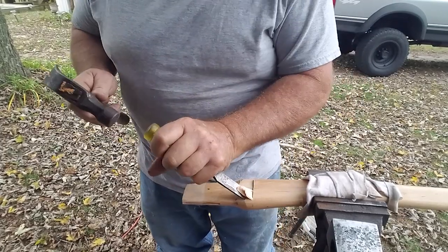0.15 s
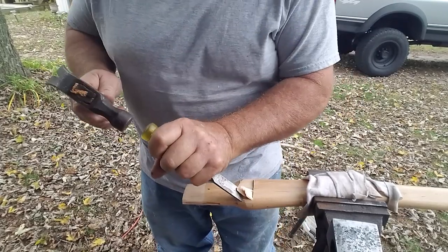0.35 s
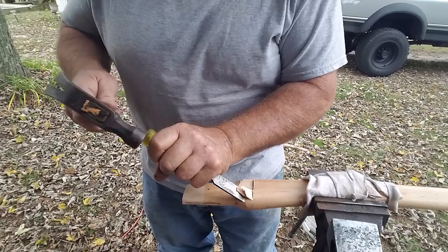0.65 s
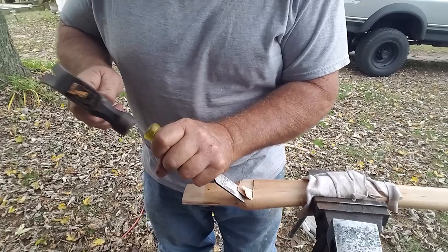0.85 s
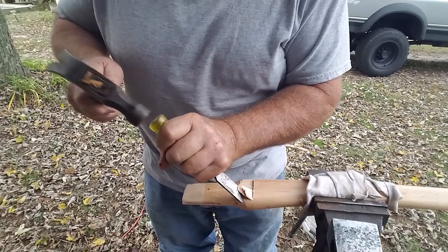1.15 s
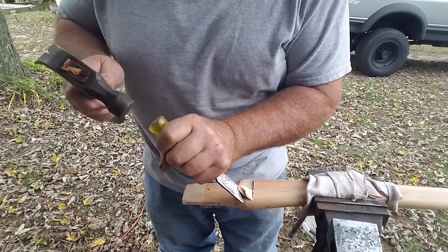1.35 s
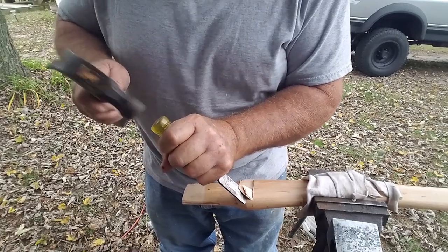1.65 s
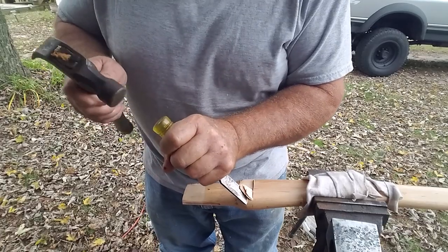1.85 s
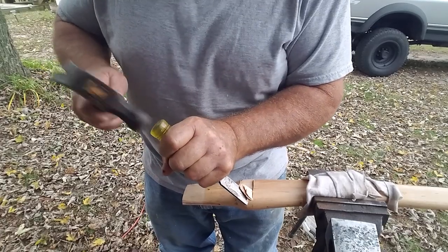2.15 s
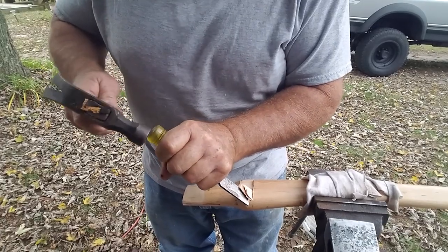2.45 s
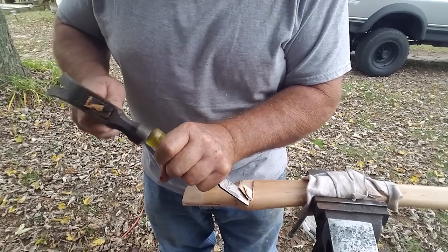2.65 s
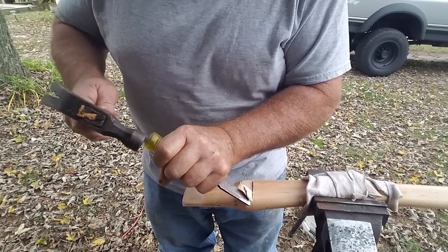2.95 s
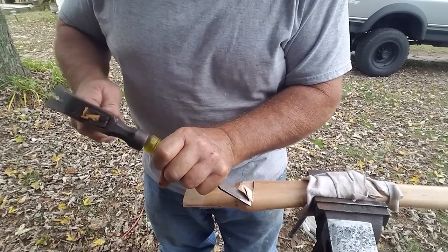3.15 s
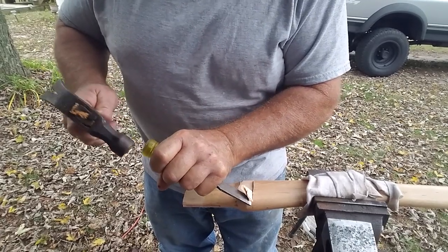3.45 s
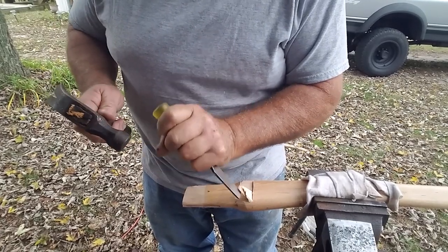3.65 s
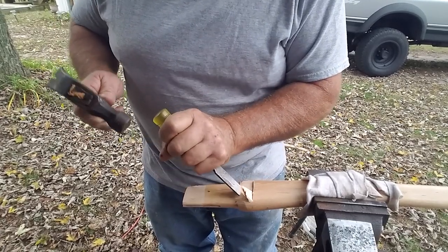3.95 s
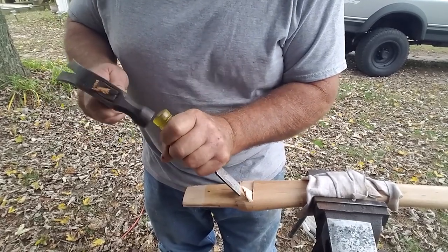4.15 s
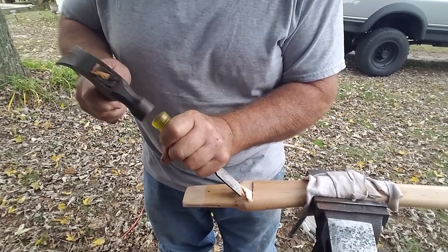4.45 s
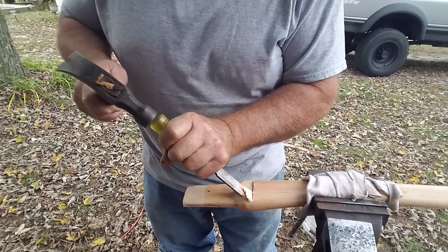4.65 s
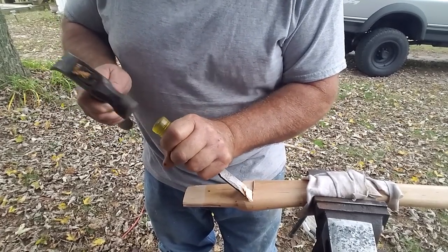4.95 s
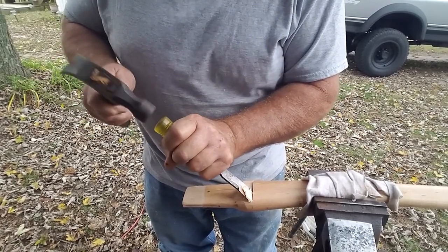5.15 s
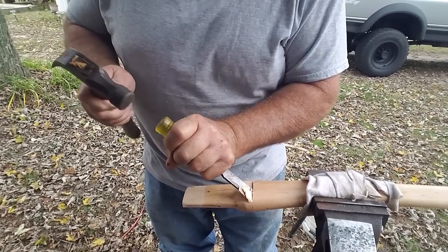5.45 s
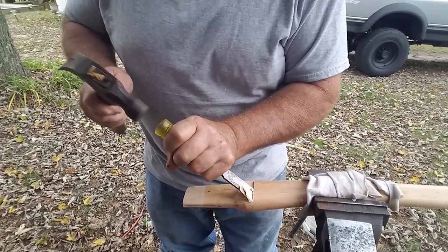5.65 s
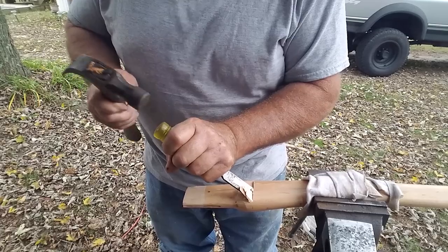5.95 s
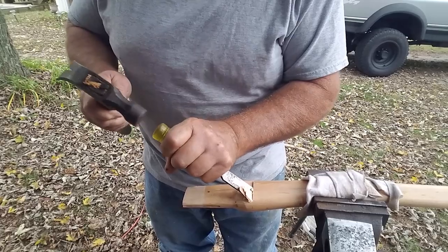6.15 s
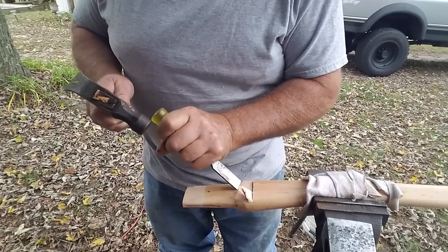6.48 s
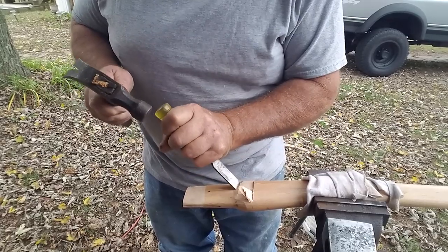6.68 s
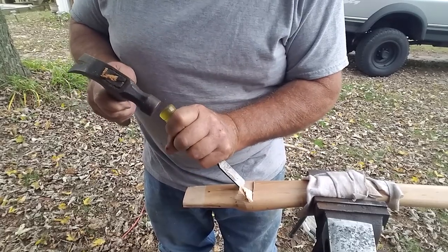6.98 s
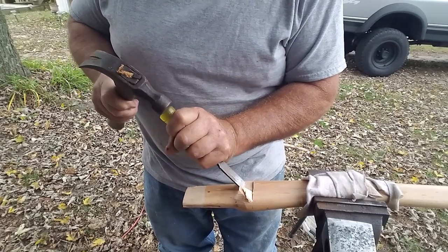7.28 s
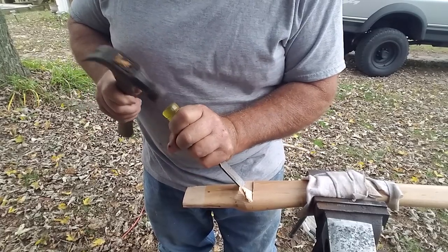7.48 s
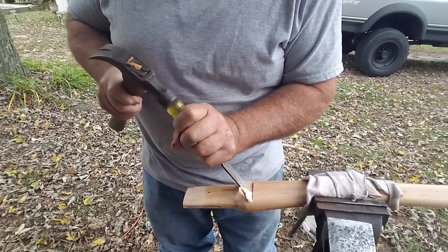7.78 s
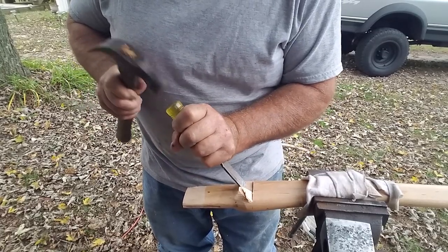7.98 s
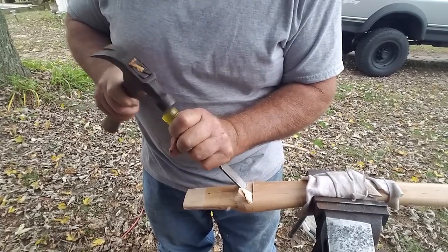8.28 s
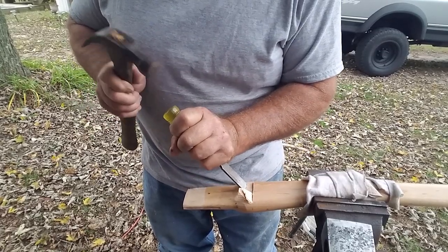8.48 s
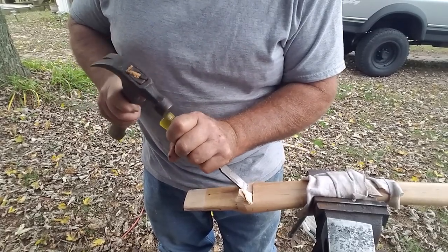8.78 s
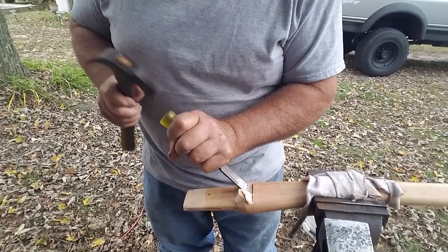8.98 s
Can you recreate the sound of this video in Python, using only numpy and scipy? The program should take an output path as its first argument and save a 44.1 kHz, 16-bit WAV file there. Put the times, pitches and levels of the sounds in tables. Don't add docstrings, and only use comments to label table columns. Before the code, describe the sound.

A steel hammer taps then drives a chisel into wood in a loose clanking vise, about four blows a second, with crickets chirping outdoors.

```python
import sys
import numpy as np
from scipy import signal
from scipy.fft import rfft, irfft, next_fast_len
from scipy.io import wavfile
from scipy.ndimage import uniform_filter1d, map_coordinates

SR = 44100
rng = np.random.default_rng(int(sys.argv[2]) if len(sys.argv) > 2 else 0)


def how_loud(loudness_db):
    steps = np.asarray(loudness_db, float) / 20
    return 10 ** steps


def pcm_store(signal):
    levels = np.round(np.clip(np.atleast_2d(signal), -1, 1) * 32767)
    wavfile.write(sys.argv[1], SR, levels.astype(np.int16).T)


N = 402191


def along(points, hz):
    f, v = np.transpose(points)
    return np.interp(np.log(hz + 1), np.log(f + 1), v)


def at(s, points):
    return np.interp(s, *np.transpose(points))


def nearest(s, rows):
    return min(rows, key=lambda row: abs(row[0] - s))[1:]


def unit(x):
    return x / np.sqrt(np.mean(x ** 2) + 1e-20)


def wobble(rate_hz):
    knots = rng.standard_normal(int(N * rate_hz / SR) + 4)
    return map_coordinates(knots, [np.arange(N) * rate_hz / SR])


def sine(hz, t):
    return np.sin(2 * np.pi * hz * t)


def glide(hz):
    return np.sin(2 * np.pi * np.cumsum(hz) / SR)


def filtered(x, response):
    n = x.shape[-1]
    m = next_fast_len(n + 4096)
    return irfft(rfft(x, m) * response(np.fft.rfftfreq(m, 1 / SR)), m)[..., :n]


def add(track, s, sound):
    part = track[..., round(s * SR):][..., :sound.shape[-1]]
    part += sound[..., :part.shape[-1]]


def noise(size, spectrum, alike):
    def mid_side(hz):
        turn = np.arccos(np.clip(along(alike, hz), -1, 1)) / 2
        return how_loud(along(spectrum, hz)) * [np.cos(turn), np.sin(turn)]

    mid, side = filtered(rng.standard_normal((2, size)), mid_side)
    return unit(np.array([mid + side, mid - side]))


# t/s, rumble/dB, drone/dB, hiss/dB
YARD = [(0.0, -67, -55.5, -71), (1.399, -62, -55.5, -70), (2.439, -50.5, -53.5, -72.5),
        (4.001, -52, -53.5, -70), (6.069, -56, -56.5, -73.5), (6.9, -51.5, -52.5, -70),
        (7.6, -55, -52.5, -69), (9.12, -51.5, -55.5, -77)]
# f/Hz, density/dB
RUMBLE = [(20,-18),(40,-1),(70,2.5),(110,-3.5),(160,0),(300,-46.5)]
DRONE = [(71, -46), (120, -23.5), (236, -8), (393, -9.5), (421, -21.5), (459, -1.5), (499, -11.5),
         (866, -14), (1250, -21.5), (1750, -20.5), (2100, -22.5), (3500, -29), (4550, -55.5), (7700, -120)]
HISS = [(1500, -12), (2700, -2), (3130, -12), (3920, -3.5), (4010, -5), (4420, -6), (4820, -13),
        (5710, -6.5), (6080, -5), (6650, -21), (7620, -11.5), (8800, -22), (15200, -13.5), (16000, -16),
        (17000, -44.5)]
# f/Hz, left-right likeness; f/Hz, left-right level/dB
FAR = [(60, 0.88), (180, 0.99), (550, 0.54), (1650, -0.34), (4970, -0.17), (15000, -0.22)]
FAR_LEAN = [(60, -1), (180, 4.5), (550, 2.5), (1650, 2), (4970, -0.5), (15000, -5)]


def yard():
    s, *levels = np.transpose(YARD)
    rumble_db, drone_db, hiss_db = [np.interp(np.arange(N) / SR, s, db) for db in levels]
    rumble = how_loud(rumble_db - 2.6 + 2.6 * wobble(12.0)) * noise(N, RUMBLE, FAR)
    drone = how_loud(drone_db - 3.0 + 0.96 * wobble(8.9)) * noise(N, DRONE, FAR)
    hiss = how_loud(hiss_db + 5.0 + 0.7 * wobble(16)) * noise(N, HISS, FAR)
    lean = lambda hz: (hz < 15900) * how_loud(along(FAR_LEAN, hz) * np.array([[.5], [-.5]]))
    return filtered(rumble + drone + hiss, lean)


# t/s, f/Hz, level/dB
WHINE = [(5.9,1500,-85),(6.2,1550,-71),(6.6,1640,-68),(6.9,1680,-68),(7.1,1620,-65),(7.47,1645,-64),(7.7,1640,-62),(7.9,1620,-66),(8.17,1590,-66),(8.3,1600,-85)]
# pitch ratio, level/dB, from t/s, to t/s
WHINE_SIDES = [(0.835,-2.5,6.6,8.1),(1.11,-4,6.75,7.2)]


def machine():
    t = np.arange(N) / SR
    s, hz, db = np.transpose(WHINE)

    def tone(ratio):
        level = (1 + 0.5 * wobble(80)) * how_loud(1.5 * wobble(12))
        return level * glide(ratio * np.interp(t, s, hz) + 22 * wobble(90))

    tones = tone(1)
    for ratio, side_db, start, stop in WHINE_SIDES:
        gate = np.interp(t, [start - 0.1, start, stop, stop + 0.11], [0, 1, 1, 0])
        tones = tones + how_loud(side_db) * gate * tone(ratio)
    return how_loud(np.interp(t, s, db, -120, -120)) * tones


# t/s, start f/Hz, end f/Hz, length/s, level/dB
TWEETS = [(2.086,5100,5830,.022,-59),(2.105,5320,5150,.022,-57),(6.374,6640,6540,0.038,-67)]


def birds():
    out, t = np.zeros(N), np.arange(SR // 8) / SR
    for s, start_hz, end_hz, length_s, db in TWEETS:
        u = np.clip(t / length_s, 0, 1)
        add(out, s, how_loud(db) * np.sin(np.pi * u) * glide(start_hz + (end_hz - start_hz) * u))
    return out * how_loud([[1.5], [-1.5]])


# t/s, level/dB
CHIRPS = [(1.562,-53),(1.624,-49),(2.327,-55),(2.386,-61),(3.162,-51),(3.881,-52.5),(3.944,-49),(4.741,-49.5),(4.802,-51),(5.514,-54),(6.315,-58.5),(6.378,-53.5),(7.058,-54.5),(7.125,-51.5),(7.565,-50),(7.963,-54.5),(8.425,-55.5),(8.487,-55),(8.885,-68),(8.944,-57)]
# wait/s, level/dB
CHIRP_ECHOES = [(.017, -9), (.04, -15)]


def crickets():
    out, t = np.zeros(N), np.arange(SR // 8) / SR
    rise_s, fall_s = 0.0125, 0.004
    fall = 0.6 * np.exp(-((t - rise_s) / fall_s) ** 2) + 0.4 * np.exp(-(t / 0.029) ** 8)
    swell = np.where(t < rise_s, (t / rise_s) ** 1.3, fall)
    for s, db in CHIRPS:
        call = how_loud(db + 2) * swell * np.sin(2 * np.pi * (4280 * t - 4800 * t ** 2))
        for wait_s, drop_db in [(0, 0)] + CHIRP_ECHOES:
            add(out, s - 0.0035 + wait_s * rng.uniform(0.9, 1.1), how_loud(drop_db) * call)
    clock = np.arange(N) / SR
    pulses = np.maximum(np.cos(2 * np.pi * 11 * (clock - 6.965)), 0) ** 2 * (clock > 6.9)
    chorus = unit(filtered(rng.standard_normal(N), lambda hz: np.exp(-((hz - 5650) / 70) ** 2)))
    return out * how_loud([[1.5], [-1.5]]) + how_loud(-75.0 + 3.2 * wobble(2.8)) * pulses * chorus


def echoes(x):
    t = np.arange(SR // 3) / SR
    tail = how_loud(-46 - 60 * t / 0.19) * (t > 0.02)
    wall = how_loud(-55.5 - 60 * (t - 0.088) / 0.09) * (t > 0.088)
    band = lambda hz: (hz / 1300) ** 2 / (1 + (hz / 1300) ** 2) / (1 + (hz / 5000) ** 2)
    response = (tail + wall) * rng.standard_normal((2, len(t)))
    return signal.fftconvolve(filtered(x, band), response, axes=1)[:, :N]


def ring(modes, attack_s, scatter_db, spread, wide=0.22):
    hz, db, t60 = np.transpose(modes)[:, :, None]
    t = np.arange(int(SR * min(t60.max(), 0.6))) / SR
    strength, detune, phase = rng.standard_normal((3, len(modes), 1))
    skew = wide * hz / 2000 * phase * np.array([1, -1])[:, None, None]
    level_db = db + np.clip(scatter_db, 0, 2.5) * np.clip(strength, -2, 1) - 60 * t / t60
    tones = how_loud(level_db) * np.sin(2 * np.pi * hz * (1 + spread * detune) * t + skew)
    end_fade = np.minimum(1, 4 - 4 * t / t[-1])
    return tones.sum(1) * (1 - np.exp(-t / attack_s)) * end_fade


# f/Hz, density/dB
SCATTER = [(59, -40), (100, -12), (319, -9.5), (648, -9.5), (914, -9.5), (1110, -8), (1560, -11.5),
           (2160, -20.5), (2460, -14.5), (3610, -27), (4580, -31.5), (5800, -35), (9500, -43), (14600, -43),
           (15900, -41), (17000, -106)]
# f/Hz, t60/s
FADE = [(100,0.38),(300,0.25),(1000,0.12),(3000,0.14),(8000,0.12),(15000,0.105)]
# f/Hz, left-right likeness
NEAR = [(60,1),(300,.98),(700,.75),(1650,.4),(5000,.2),(15000,.2)]


def scatter(tilt_db, speed, bass_db):
    hz, t, z = signal.stft(noise(SR // 3, SCATTER, NEAR), SR, nperseg=128)
    slope_db = tilt_db * np.clip(np.log2(hz / 2000 + 1e-3) / 2, 0, 1) + bass_db * (hz < 200)
    lumps = uniform_filter1d(rng.standard_normal(z.shape[1:]), size=2, axis=0)
    lumps = unit(uniform_filter1d(lumps, size=4, axis=1))
    decay_db = 60 * speed * t / along(FADE, hz)[:, None]
    z = z * how_loud(slope_db[:, None] + 4.5 * np.minimum(lumps, 1.6) - decay_db)
    tail = signal.istft(z, SR, nperseg=128)[1]
    return tail * (1 - np.exp(-np.arange(tail.shape[1]) / SR / 0.0023))


# t/s, handle ring extra/dB, stand sway extra/dB, blade shiver/dB
SHARES = [(0.6, -1, -16, -34), (0.89, -0.5, 3, -36), (1.17, -2.5, -2.5, -28.5), (1.43, 0.5, -1, -34.5),
          (1.67, -1, -1.5, -41.5), (1.92, 0.5, 1, -20), (2.16, -3, 4.0, -26.5), (2.4, 0.5, 2.0, -23.5),
          (2.65, -0.5, 1.5, -40), (2.88, -1.5, 2, -30), (3.11, 2, -1.5, -38.5), (3.32, -0.5, 1.5, -20.5),
          (3.77, 0, 10.5, -40.5), (4.12, -1.5, 0.5, -34.5), (4.34, 1.5, 1.5, -25.5), (4.58, 2.5, -1, -25.5),
          (4.82, -1, -2.5, -22.5), (5.07, -4, -4, -28), (5.3, -1.5, 2, -38.5), (5.53, 2.5, -1, -21),
          (5.77, -3, 1.5, -28), (6.0, -4, 1, -24), (6.48, -4, 6, -48), (6.92, 14, 13.5, -71),
          (7.24, -3.5, 11.5, -30), (7.51, -3, -0.5, -26), (7.77, -5, -1, -26.5), (8.01, -7, -1, -22),
          (8.27, 0.5, -1.5, -27.5), (8.53, -3.5, -0.5, -20), (8.77, 3.5, 1.5, -28),
          (9.01, -5.5, -0.5, -22.5)]


def shares(s):
    return nearest(s, SHARES)


# t/s, jaw/dB, screw bar/dB, plate/dB
CLANKS = [(1.6955, -23, -60, -71.5), (1.9501, -20, -49.5, -70.5), (2.19, -18.5, -46, -52.5),
          (2.43, -22, -58, -53.5), (2.678, -28, -50.5, -86), (2.9074, -26.5, -49, -51.5),
          (3.1368, -23.5, -46.5, -71.5), (3.349, -28, -41.5, -70.5), (4.3678, -29.5, -53, -79),
          (4.6059, -30.5, -61, -65.5), (5.3261, -26, -74.5, -84), (5.5545, -24, -58, -48.5),
          (5.7921, -25.5, -50, -63), (6.0249, -23, -56, -46), (7.531, -35, -52.5, -81),
          (7.793, -26.5, -54.5, -65), (8.0376, -25.5, -63.5, -72), (8.297, -25.5, -44.5, -72),
          (8.5591, -34, -60, -51.5), (8.8012, -23.5, -51, -50.5), (9.036, -24.5, -47.5, -52)]
# t/s, peak/dB
JAW_NOTES = [(1.6972, -25), (1.9569, -13), (1.9661, -15.5), (1.9761, -36), (2.1902, -25.5), (2.1991, -17.5),
             (2.2159, -18.5), (2.4335, -13), (2.6763, -20), (2.6838, -22), (2.913, -19.5), (3.1356, -18),
             (3.1433, -22.5), (3.3529, -16), (4.3702, -25.5), (4.6069, -18.5), (5.3279, -18.5),
             (5.5531, -16.5), (5.7879, -27), (6.0261, -27), (6.0329, -17.5), (7.533, -26), (7.7924, -19),
             (8.0387, -27), (8.2867, -22), (8.297, -28), (8.559, -23.5), (8.7946, -25), (8.8037, -18.5),
             (9.035, -22)]
# t/s, peak/dB
JAW_KNOCKS = [(1.696, -19), (1.953, -15.5), (2.192, -23.5), (2.677, -18), (2.907, -17.5), (3.349, -21.5),
              (4.604, -16.5), (7.794, -13), (8.287, -14), (8.297, -14.5), (8.801, -26)]
# t/s, level/dB
PIN_JUMPS = [(1.949, -60.5), (2.191, -50), (2.429, -47.5)]
# f/Hz, level/dB, t60/s
NOTE = [(2408, -1, 0.045), (2484, -4.5, 0.033)]
KNOCK = [(1490, -1.5, 0.032)]
STAND = [(48.8,-18.5,0.74),(70.13,-9,0.59),(87.3,-20,0.94),(96.1,-5.5,0.36),(108.3,2.5,0.27),(127.4,-13.5,0.52),(177.5,-5.5,0.31),(201.9,3,0.16),(285.3,4,.15)]
JAW = [(470,-10,.08),(915,-5,.06),(1520,-10,.035),(1976,-18,.05),(2580,-12,.03),(2955,-12,.03),(4550,-20,.04),(5350,-19,.04)]
BAR = [(3490,0,.43),(6218,-18,.25)]
PLATE = [(8866,1,.09),(9001,-5,.08),(12700,-15,.06),(14300,-11,.08),(15150,-15,.05)]
PIN = [(6218,-6,.2),(6520,2,.06),(6853,9,.09),(7887,-3,.12),(9900,-6,.08),(11350,0,.17)]


def vise():
    out = np.zeros((2, N))
    snap = how_loud(-60 * np.arange(SR // 50) / SR / 0.0068)
    sways = [(s, -27.5 + 0.97 * (force_db + 22.5)) for s, force_db, *_ in BLOWS]
    sways += [(s, force_db - 22) for s, force_db, *_ in TAPS]
    for s, stand_db in sways:
        sway = ring(STAND, attack_s=0.018, scatter_db=1.5, spread=0.03)
        add(out, s + 0.009, how_loud(stand_db + shares(s)[1] + 11.5) * sway)
    for rows, modes in [(JAW_NOTES, NOTE), (JAW_KNOCKS, KNOCK)]:
        for s, db in rows:
            add(out, s, how_loud(db + 5.5) * ring(modes, attack_s=0.0026, scatter_db=2.0, spread=0.014))
    for s, pin_db in PIN_JUMPS:
        add(out, s, how_loud(pin_db + 10.5) * ring(PIN, attack_s=0.0041, scatter_db=-2.3, spread=0.00017))
    for s, jaw_db, bar_db, plate_db in CLANKS:
        add(out, s, how_loud(bar_db + 5.0) * ring(BAR, attack_s=0.011, scatter_db=-3.8, spread=0.00037))
        plate = ring(PLATE, attack_s=0.014, scatter_db=6.0, spread=0.0004)
        add(out, s - 0.018, how_loud(plate_db + 20.5) * plate)
        add(out, s, how_loud(jaw_db + 1) * noise(len(snap), CRACK, NEAR) * snap)
        add(out, s, how_loud(jaw_db + 1.5) * scatter(4, speed=1.5, bass_db=-9))
        for wait_s, drop_db in [(0, -1.5), (0.007, -3), (0.02, -14)]:
            late_s = wait_s * rng.uniform(0.92, 0.96)
            bounce = ring(JAW, attack_s=0.002, scatter_db=1.5, spread=0.008)
            add(out, s + late_s, how_loud(jaw_db + 9 + drop_db) * bounce)
    return out


def thud(hz):
    t = np.arange(SR // 8) / SR - 0.008
    swell = np.where(t < 0, np.exp(-(t / 0.0045) ** 2), how_loud(-60 * np.abs(t) / 0.032))
    return swell * np.cos(2 * np.pi * hz * (1 + 0.013 * rng.standard_normal()) * t + 0.61)


# t/s, peak/dB, thud/dB
NUDGES = [(0.223, -44, -19), (0.263, -44, -1), (0.28, -53, 12), (0.325, -44, -3), (0.344, -45, 0),
          (0.726, -39, -11), (2.518, -28.5, 9.5), (6.148, -43, 4), (6.511, -30, -2.5), (6.61, -38, 5.5),
          (6.621, -35.5, -4), (6.627, -49.5, 20), (6.647, -50, 17.5), (8.122, -35.5, 9)]
# t/s, f/Hz, level/dB, t60/s
SCRAPES = [(.218, 486, -48, 0.12), (.314, 963, -50, 0.17), (.725, 1560, -50, 0.03),
           (6.506, 1030, -31, 0.079), (6.51, 2260, -45, 0.067), (6.53, 936, -41.5, 0.099)]
# t/s, level/dB
FREE_RINGS = [(.602, -11), (0.891, -44), (1.173, -15.5), (1.4306, -15)]
# f/Hz, level/dB, t60/s
BLADE = [(1034, -6, 0.065), (1863, -5, 0.026), (2075, -8, 0.045)]


def blade():
    out = np.zeros((2, N))
    for s, db, thud_db in NUDGES:
        add(out, s, how_loud(db - 7.5) * scatter(-15, speed=1.83, bass_db=-8.0))
        add(out, s - 0.003, how_loud(db + thud_db - 3.5) * thud(hz=310))
    for s, db in FREE_RINGS:
        add(out, s, how_loud(db) * ring(BLADE, attack_s=0.0016, scatter_db=12.5, spread=0.0043))
    for s, hz, db, t60 in SCRAPES:
        add(out, s, how_loud(db) * ring([(hz, 0, t60)], attack_s=0.005, scatter_db=7.0, spread=0.0045))
    return out


# t/s, wait/s
THUD_WAIT = [(1.2, .01), (1.43, .0185), (1.92, .015), (2.16, .015), (3.33, .0144), (3.77, .0105),
             (4.12, .0171), (4.35, .0153), (4.8, .0144), (6.0, .0143), (6.4, .009), (7.25, .0105),
             (7.5, .0172), (7.77, .0148), (9.1, .0138)]
# wait/s, level under it/dB
BLOW_CHATTER = [(0.0147, -13.5)]
TAP_CHATTER = [(.007, -28.5), (0.022, -12), (0.033, -19)]
# t/s, peak/dB
REBOUNDS = [(1.6991, -16.5), (1.7128, -13), (1.9677, -9.5), (2.194, -9), (2.6863, -8.5), (2.9094, -20.5),
            (2.9162, -10), (3.137, -8.5), (3.372, -34), (4.373, -9.5), (4.3903, -16.5), (4.609, -5),
            (4.617, -10.5), (4.8656, -12), (5.3313, -8), (5.565, -14), (5.803, -18.5), (6.543, -37),
            (7.539, -16), (7.551, -9), (7.797, -19), (7.809, -6), (8.045, -21.5), (8.0565, -14.5),
            (8.303, -14), (8.5817, -18.5), (8.8051, -12), (8.8175, -12), (9.04, -11), (9.0543, -13)]
# t/s, f/Hz, level/dB, t60/s
TAP_NOTES = [(1.172, 463, -17.5, 0.047), (3.777, 1070, -12, 0.034), (3.774, 1600, -28, 0.032),
             (6.475, 1080, -20.5, 0.052), (6.918, 1067, -20.5, 0.041), (6.918, 566, -25.5, 0.033)]
# t/s, f/Hz, level/dB, t60/s
HUMS = [(.606, 325, -22.5, 0.14), (0.897, 327, -29.5, 0.2), (1.176, 315, -20.5, 0.11),
        (1.432, 297, -30, 0.21), (3.778, 321.7, -25, 0.21), (6.482, 315.6, -31.5, 0.34),
        (6.923, 322, -23, 0.17), (7.249, 310, -26.5, 0.19)]


def handle():
    out = np.zeros((2, N))
    thuds = []
    for rows, chatter in [(BLOWS, BLOW_CHATTER), (TAPS, TAP_CHATTER)]:
        for s, *_, thud_db in rows:
            for wait_s, drop_db in [(0, 0)] + chatter:
                thuds.append((s + at(s, THUD_WAIT) + wait_s, thud_db + drop_db))
    for s, db in thuds + REBOUNDS:
        add(out, s - 0.0075, how_loud(db) * thud(hz=262 - 1.5 * db))
    for s, hz, db, t60 in TAP_NOTES:
        add(out, s, how_loud(db) * ring([(hz, 0, t60)], attack_s=0.00064, scatter_db=-1.5, spread=0.002))
    for s, hz, db, t60 in HUMS:
        add(out, s, how_loud(db) * ring([(hz, 0, t60)], attack_s=0.005, scatter_db=7.0, spread=0.0045))
    return out


# t/s, force/dB, butt/dB, tick/dB, handle thud/dB
BLOWS = [(1.67, -24, -24, -18, -6.5), (1.9245, -22, -11, -18.5, -2.5), (2.159, -23, -7, -15.5, -2),
         (2.3992, -23, -8.5, -19, -2.5), (2.6495, -24, -12, -19.5, -3.5), (2.8803, -23, -8.5, -19.5, -6.5),
         (3.109, -22, -14, -22, -10.5), (3.3214, -21.5, -16, -22.5, -4), (4.124, -27, -11.5, -32.5, -7.5),
         (4.3445, -24.5, -11, -25.5, -6.5), (4.5777, -23, -7.5, -20, -5), (4.823, -25, -7, -21.5, -10.5),
         (5.072, -27, -11.5, -24.5, -7.5), (5.301, -27, -13.5, -22.5, -5.5), (5.5262, -23.5, -7, -18.5, -8),
         (5.7667, -24.5, -9, -19.5, -6), (6.0013, -25.5, -13, -25, -5.5), (7.5059, -22.5, -10.5, -27, -4),
         (7.7661, -22.5, -7.5, -21.5, -5), (8.0113, -24, -10.5, -23, -7), (8.2683, -22.5, -8, -18.5, -7),
         (8.533, -23, -6.5, -20.5, -7), (8.7735, -24, -7.5, -20, -7.5), (9.0098, -23.5, -10.5, -23, -8)]
TAPS = [(0.6016, -34, -47, -34.5, -21.5), (0.8917, -34.5, -47, -42.5, -26.5),
        (1.1711, -30, -48, -33.5, -31.5), (1.427, -25.5, -12.5, -25, -11.5),
        (3.7733, -36, -28.5, -48.5, -17.5), (6.4755, -36, -23, -50.5, -27),
        (6.9179, -42.5, -24, -55.5, -20), (7.2447, -29.5, -16, -38.5, -19.5)]
# t/s, f/Hz
BUTT = [(0.6, 978), (4.6, 1018), (4.82, 1043), (5.06, 1114), (5.31, 1266), (5.5, 1025), (7.25, 1072),
        (7.5, 1310), (7.75, 990), (9.1, 1033)]
# t/s, share
OVERTONE = [(1.7,0.42),(2.3,0.6),(3.6,0.077)]
# t/s, wait/s
BUTT_LAG = [(3.4, .0014), (3.7, .00035)]
# t/s, f/Hz, level re butt/dB
SLAP = [(1.9, 1840, -6), (2.16, 1495, -9.5), (2.4, 1522, -4), (2.65, 1904, -10), (2.9, 1553, -10),
        (3.3, 1870, 3), (4.12, 1450, -2.5), (4.35, 1470, 4.5), (4.58, 1454, -3), (4.82, 1310, -2),
        (5.07, 1397, 0), (5.3, 1486, 0.5), (5.55, 1520, -9.5), (6.0, 1330, -5), (7.5, 1570, -11.5),
        (7.77, 1266, -4), (9.0, 1300, -7)]
# f/Hz, density/dB
CRACK = [(880, -31), (1500, -12), (2810, -12.5), (3410, -25), (4020, -10), (4440, -25.5), (6090, -20.5),
         (9510, -59.5), (10900, -39.5), (15000, -48.5), (17000, -65.5)]
# f/Hz, level/dB, t60/s
SHANK = [(1530, -6.5, 0.042), (1600, -3.5, 0.059), (1730, -7.5, 0.035), (1960, -8.5, 0.017),
         (2275, -1.5, 0.032), (2325, 0, 0.044), (2613, 0.5, 0.047), (2930, -4.5, 0.051),
         (2930, -6.5, 0.055), (3670, -16.5, 0.07), (4600, -10.5, .05)]
HANDLE = [(468,-7,0.12),(735,-12,0.12),(891.2,11,0.072),(1030,-14,0.05),(1430,-10.5,0.02)]


def hammer():
    out, t = np.zeros((2, N)), np.arange(SR // 12) / SR
    knock = (t / 0.0012) ** 2 * np.exp(2 - 2 * t / 0.0012)
    for row in BLOWS + TAPS:
        s, force_db, butt_db, tick_db, _ = row
        tick = noise(len(t), CRACK, NEAR) * how_loud(-60 * t / 0.011)
        add(out, s, how_loud(tick_db + 12.0) * tick)

        slap_hz, slap_db = nearest(s, SLAP)
        add(out, s, how_loud(butt_db + slap_db) * sine(slap_hz, t) * knock)

        hz = at(s, BUTT)
        butt = sine(hz, t) + at(s, OVERTONE) * sine(1.9 * hz, t) * np.exp(-t / 0.014)
        linger_db = -12 - 0.6 * min(force_db + 25, 0) - 60 * t / 0.055
        linger = how_loud(linger_db) * (1 - np.exp(-t / 0.003))
        add(out, s + at(s, BUTT_LAG), how_loud(butt_db + 2) * butt * (knock + linger))

        more_db, _, shiver_db = shares(s)
        shiver = ring(SHANK, attack_s=0.0017, scatter_db=4.0, spread=0.016, wide=1.1)
        add(out, s + 0.001, how_loud(shiver_db + 4.0) * shiver)

        ring_db = -25 if row in BLOWS else -21 + 2.1 * (force_db + 22.5)
        handle_ring = ring(HANDLE, attack_s=0.023, scatter_db=5.0, spread=0.0023)
        add(out, s, how_loud(ring_db + more_db + 13.5) * handle_ring)

        over_db = force_db + 30.0
        tilt_db = tick_db - force_db + 4.0
        rattle = scatter(tilt_db, speed=1.85 - 0.076 * over_db, bass_db=2.17 * over_db - 13.0)
        add(out, s, how_loud(force_db + 10.0) * rattle)
    return out


# f/Hz, left-right level/dB
LEAN = [(60, 2), (110, 2.5), (200, 3), (380, 2.5), (650, 4.5), (890, -1.5), (1290, 3), (2380, 2),
        (4400, -2), (8120, -4.5), (15000, -10.5)]
# f/Hz, left lead/rad
LEAD = [(0,0),(880,-.25),(1300,.2),(2700,.7),(4400,-.8),(15000,-3)]


def scene():
    def ports(hz):
        lead = np.exp(1j * at(hz, LEAD) * [[1], [0]])
        return how_loud(along(LEAN, hz) * np.array([[.5], [-.5]])) * lead

    bench = hammer() + handle() + blade() + vise()
    return filtered(bench, ports) + echoes(bench) + crickets() + birds() + machine() + yard()


def low_pass(x):
    return signal.sosfilt(signal.butter(12, 17120, fs=SR, output="sos"), x)


def record(dry):
    rounded = dry / (1 + np.abs(dry / 1.02) ** 6) ** (1 / 6)
    mix = filtered(rounded, lambda hz: (hz < 16900) * hz ** 2 / (hz ** 2 + 35 ** 2))
    return low_pass(mix)


dry = scene()
out = record(dry)
pcm_store(out)
```